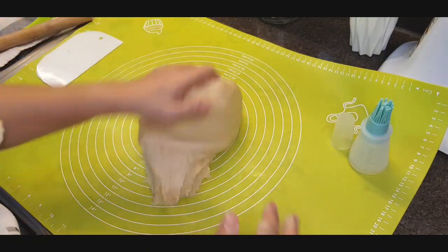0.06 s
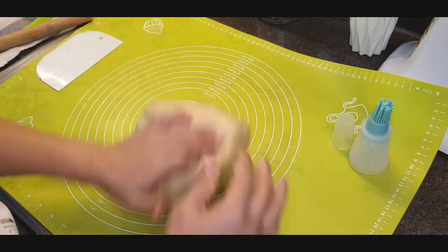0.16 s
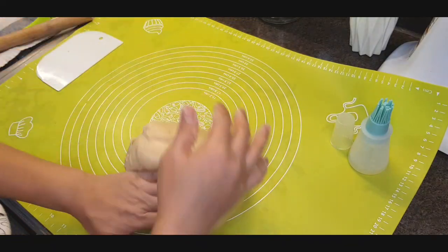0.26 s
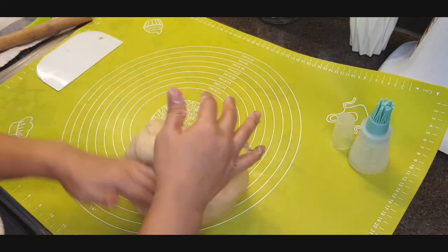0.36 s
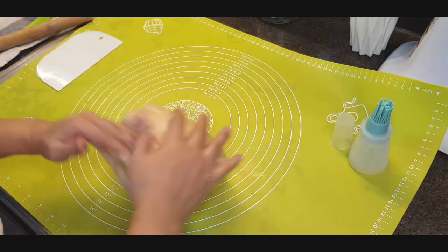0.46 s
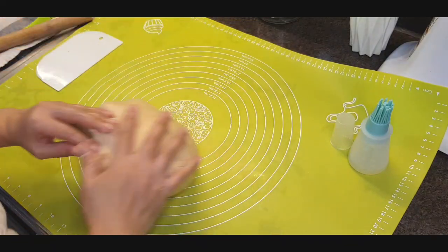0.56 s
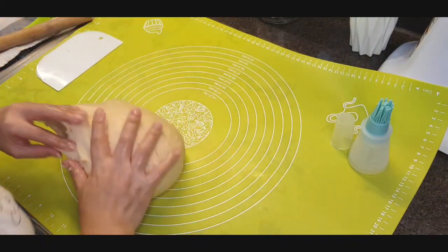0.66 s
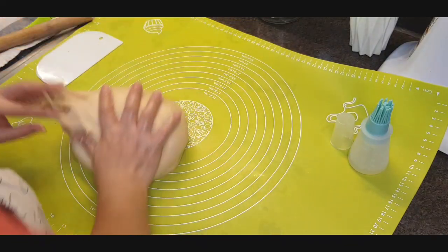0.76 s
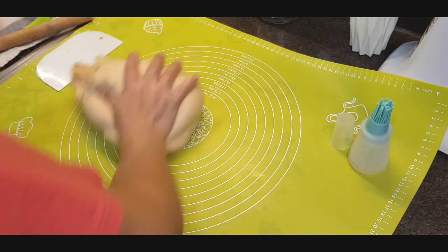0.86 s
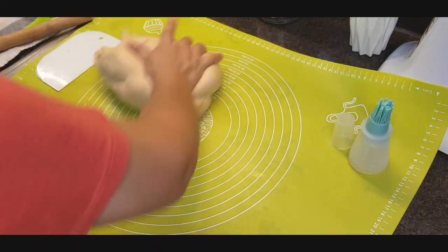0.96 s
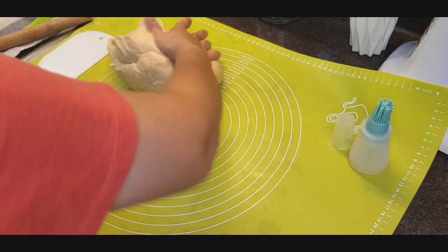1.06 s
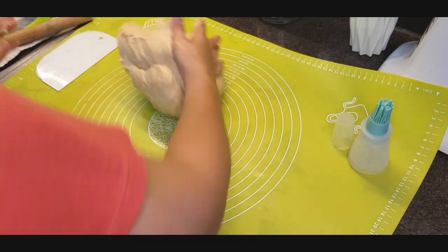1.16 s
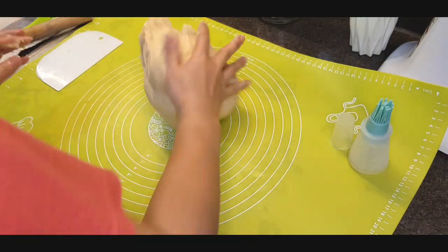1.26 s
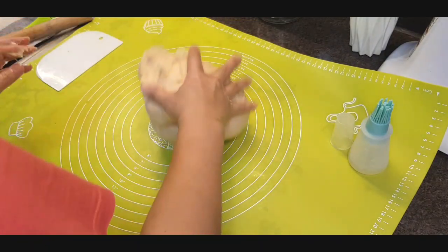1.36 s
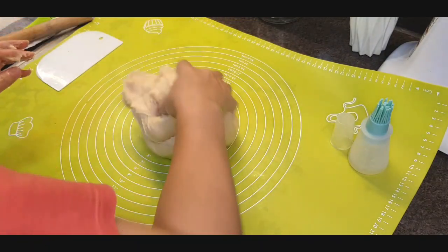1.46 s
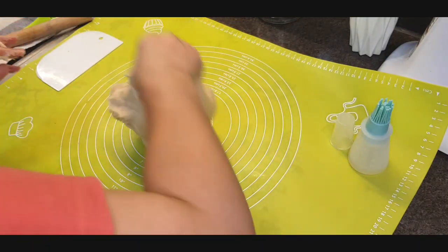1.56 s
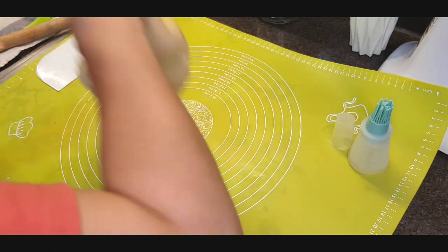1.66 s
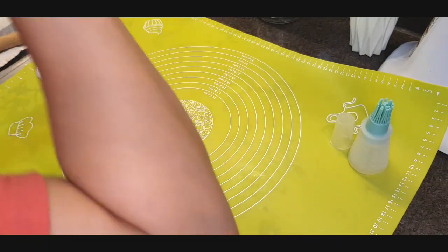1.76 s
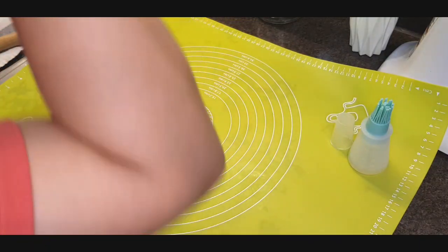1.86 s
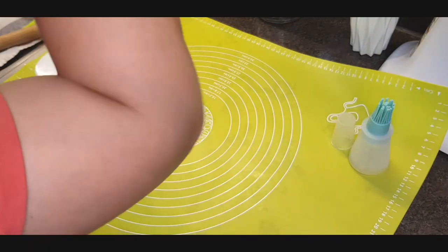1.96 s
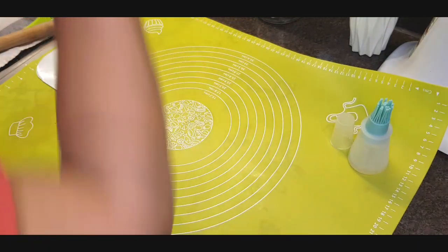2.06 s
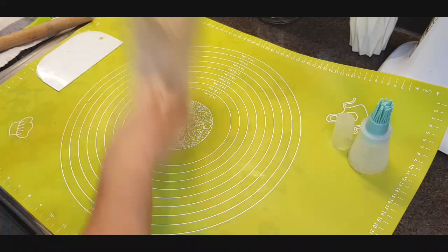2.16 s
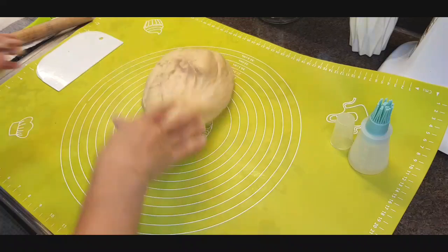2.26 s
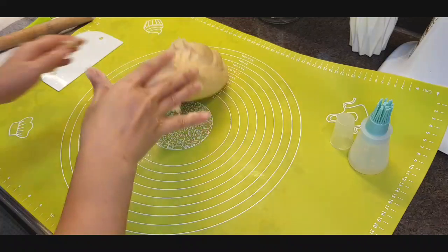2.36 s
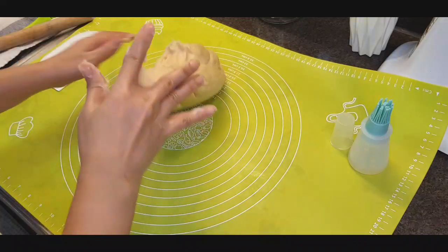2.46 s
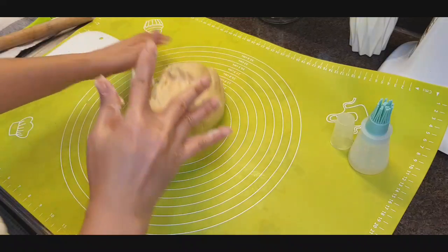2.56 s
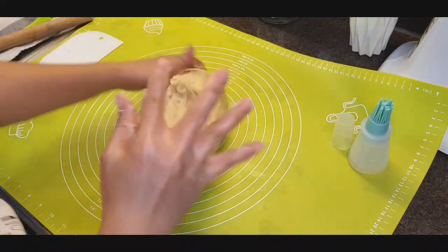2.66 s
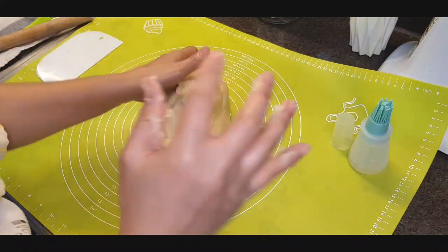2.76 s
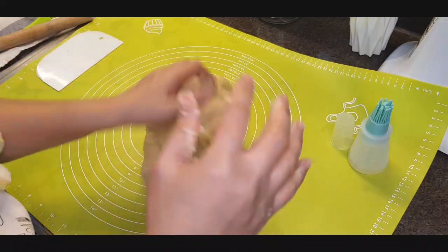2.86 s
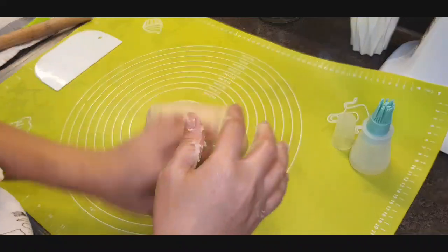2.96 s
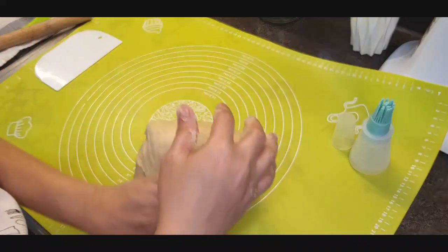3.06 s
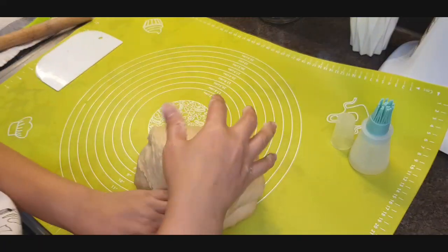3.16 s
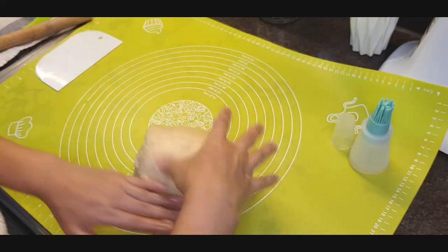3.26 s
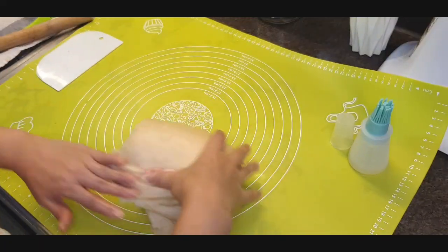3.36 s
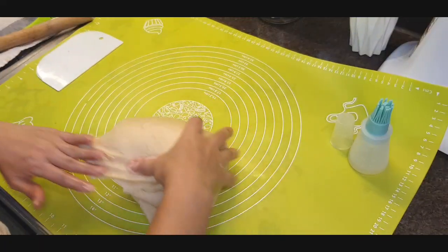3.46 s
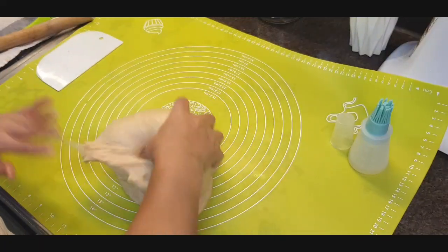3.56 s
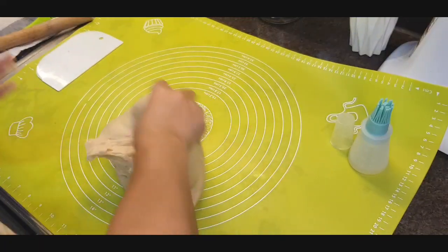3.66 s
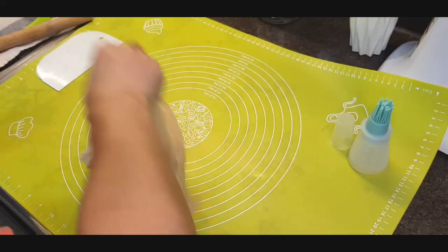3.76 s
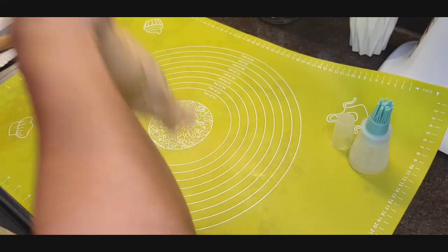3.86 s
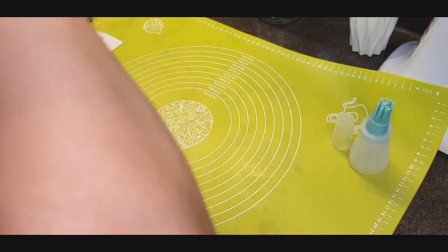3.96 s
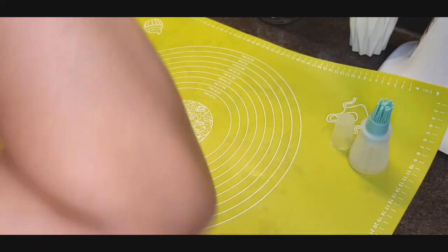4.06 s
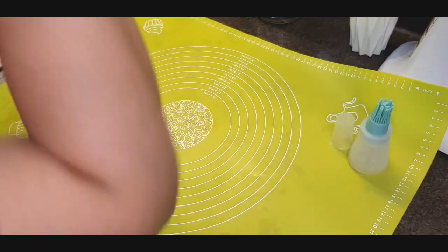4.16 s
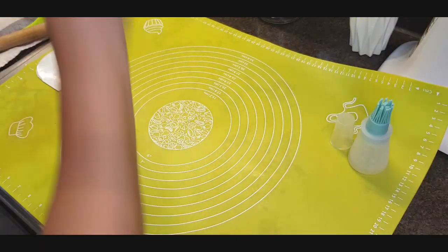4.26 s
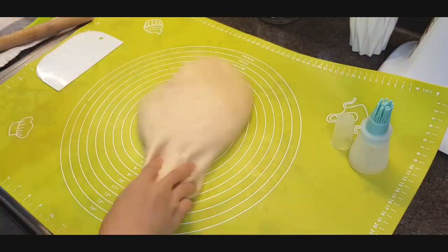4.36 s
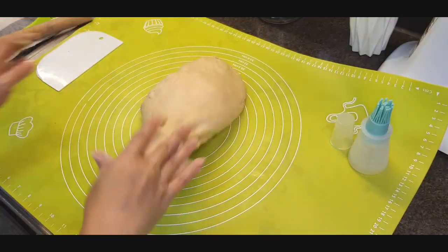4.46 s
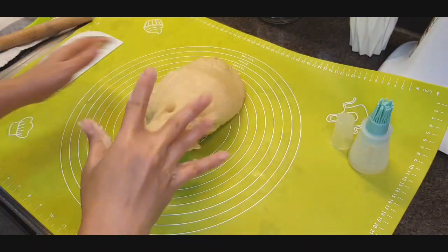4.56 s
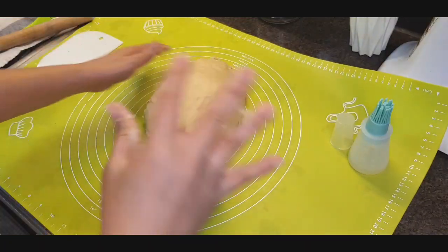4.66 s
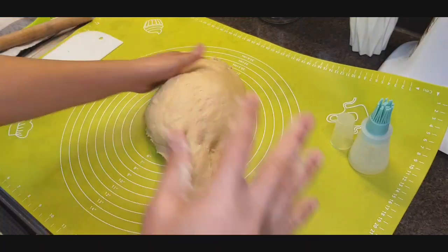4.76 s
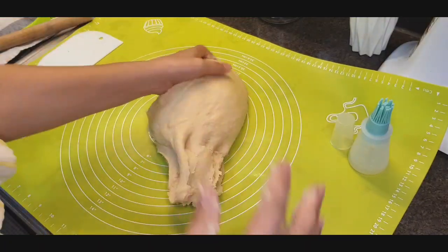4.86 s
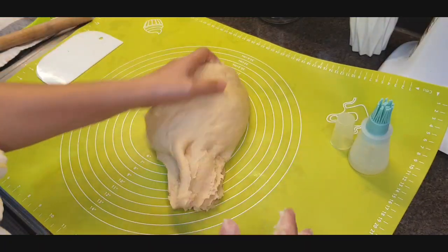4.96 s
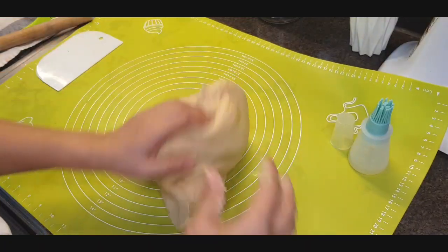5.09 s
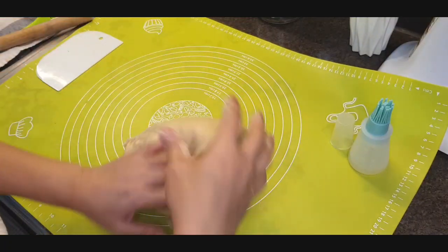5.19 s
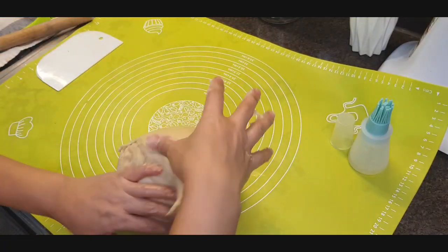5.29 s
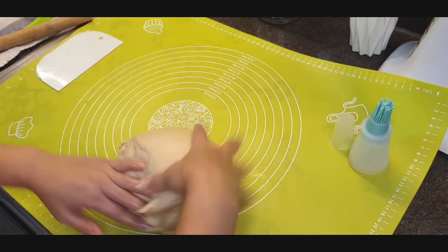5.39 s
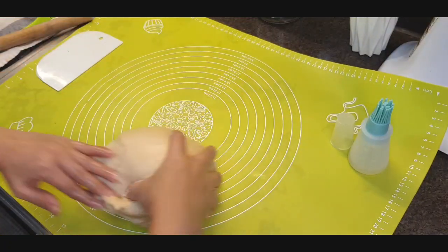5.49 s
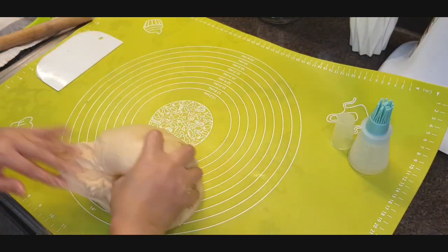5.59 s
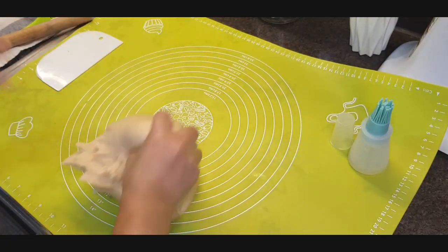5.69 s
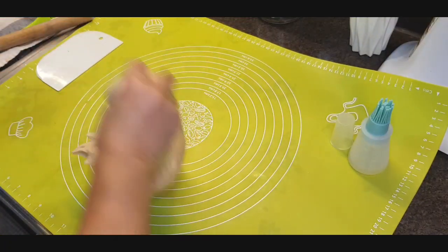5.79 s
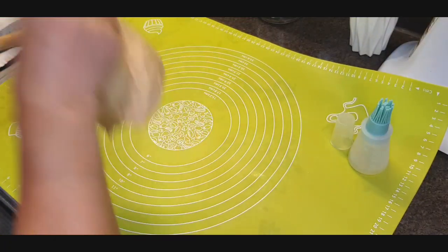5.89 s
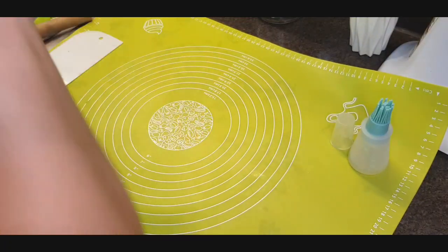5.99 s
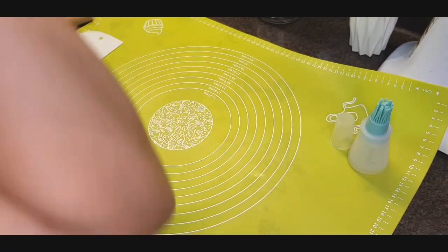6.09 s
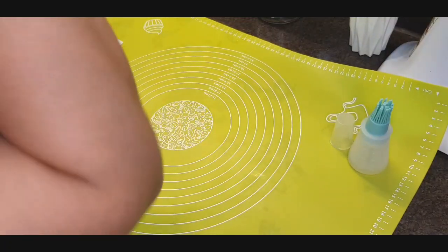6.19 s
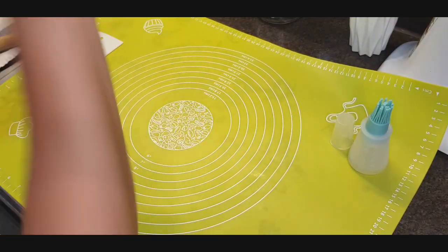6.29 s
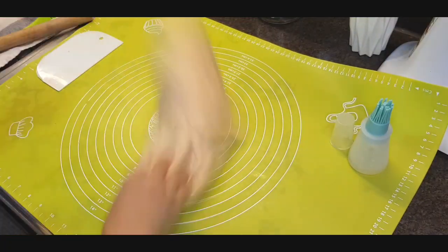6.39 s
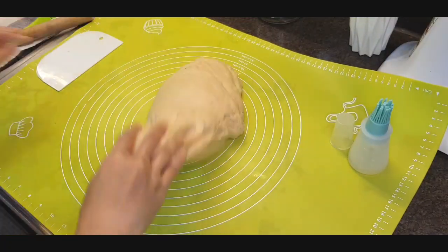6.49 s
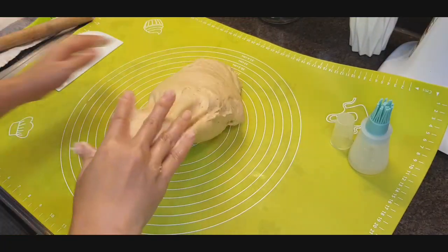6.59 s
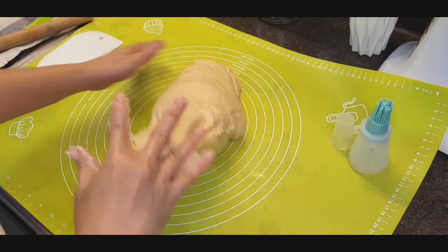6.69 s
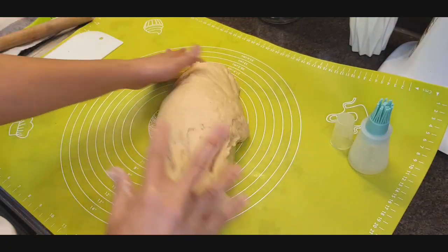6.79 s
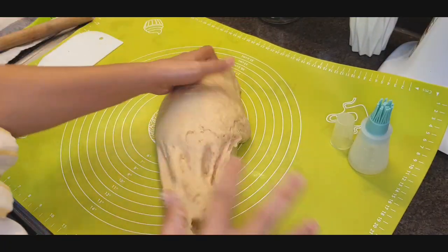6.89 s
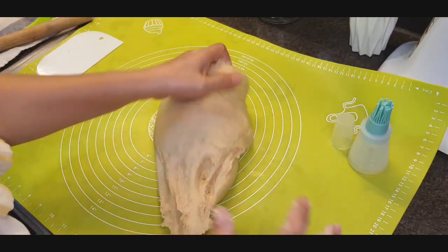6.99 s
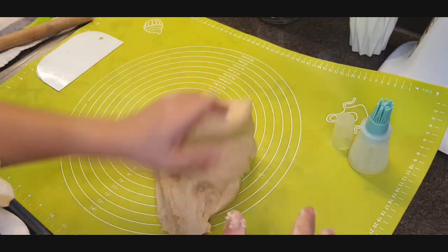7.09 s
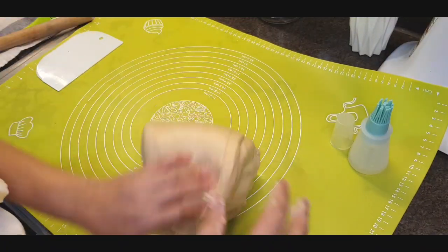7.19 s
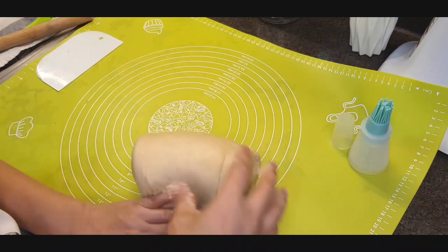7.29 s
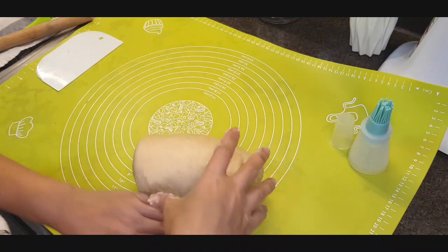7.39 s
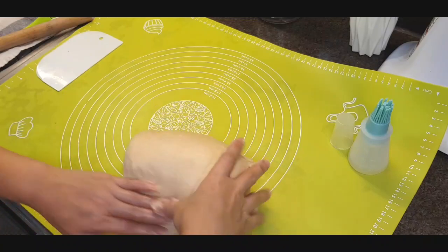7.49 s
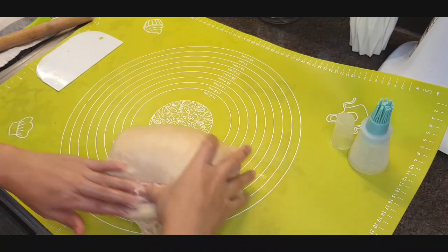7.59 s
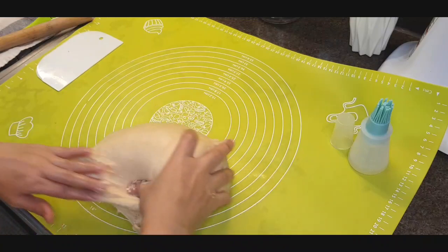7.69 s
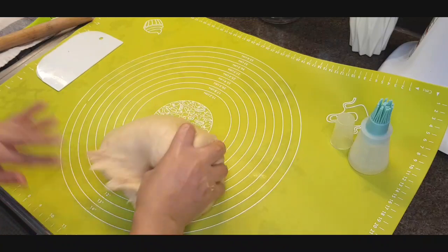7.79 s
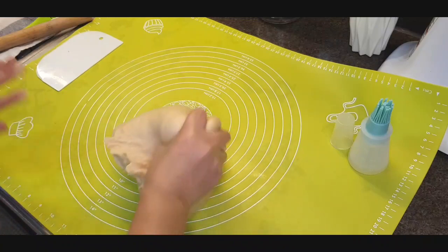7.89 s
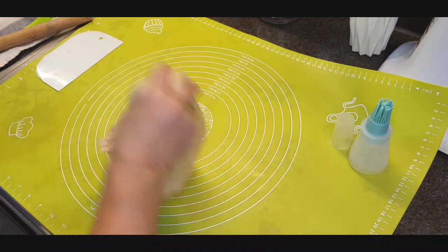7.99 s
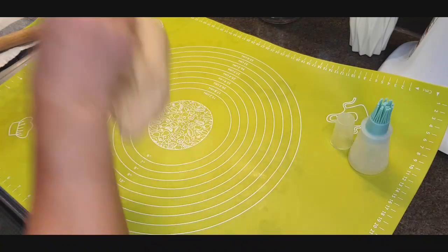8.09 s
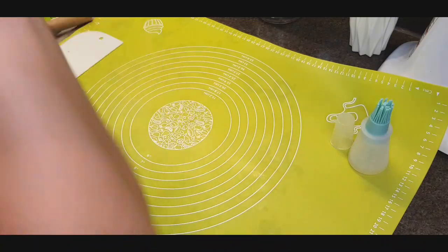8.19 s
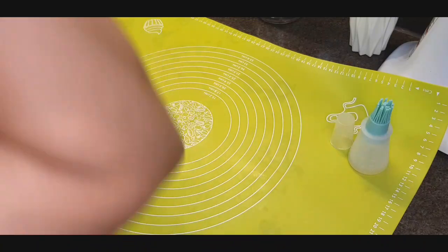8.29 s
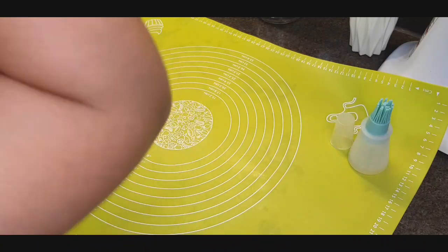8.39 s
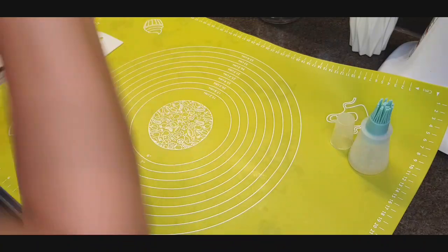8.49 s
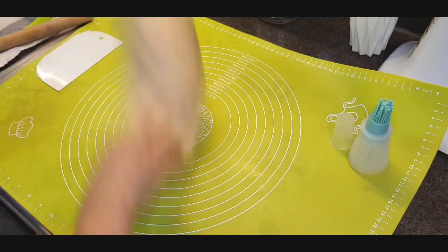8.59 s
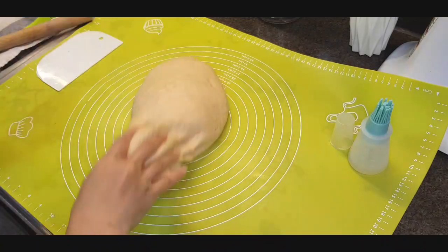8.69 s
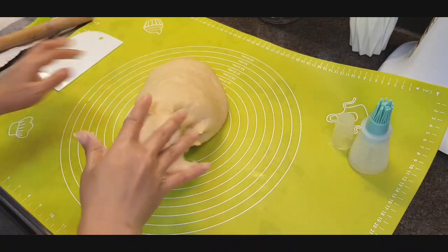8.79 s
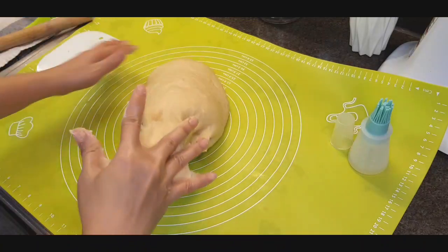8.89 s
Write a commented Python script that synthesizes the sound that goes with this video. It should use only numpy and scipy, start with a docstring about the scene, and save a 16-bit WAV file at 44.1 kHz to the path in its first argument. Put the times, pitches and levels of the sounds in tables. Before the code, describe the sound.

Hands press and fold soft, sticky dough with faint rubbing and crackle, then peel it off a silicone mat with a short hiss and small pops. The dough is slapped down four times, about two seconds apart, each a loud wet smack with a thump from the counter. The microphone is close and overloads slightly on the hits. A small, hard kitchen echoes briefly over a quiet hum.

```python
"""Slapping dough on a kitchen counter

Soft, sticky dough is slapped four times onto a silicone mat, close to a phone that overloads.
Each slap rings the counter, bursts trapped air and splatters as the dough spreads; a small, hard room
answers. In between, hands fold and press the dough and peel it off the mat, over a quiet room hum."""
import sys
import numpy as np
from scipy import signal
from scipy.fft import rfft, irfft, next_fast_len
from scipy.io import wavfile
from scipy.ndimage import uniform_filter1d

SR = 44100
rng = np.random.default_rng(int(sys.argv[2]) if len(sys.argv) > 2 else 0)


def output_pcm(signal):
    """Save a mono or channel-first signal as 16-bit PCM at the path in sys.argv[1].

    Samples are clipped to [-1, 1] before scaling.
    """
    pcm = np.clip(np.atleast_2d(signal).T, -1, 1) * 32767
    wavfile.write(sys.argv[1], SR, np.round(pcm).astype(np.int16))


N = 394254
T = np.arange(int(.8 * SR)) / SR  # seconds since the start of one short sound


def gain(db):
    """Turn decibels into a multiplier."""
    return 10 ** (np.asarray(db) / 20)


def unit(x):
    """Scale a sound to an average (rms) level of 1."""
    return x / np.sqrt(np.mean(x ** 2))


def add(out, start_s, sound):
    """Mix a sound in at the given time."""
    i = max(int(start_s * SR), 0)
    out[i:i + len(sound)] += sound[:len(out) - i]


def curve_at(hz, points):
    """Read between (pitch_hz, value) points, with octaves evenly spaced."""
    pitches, values = np.transpose(points)
    return np.interp(np.log(hz + 1), np.log(pitches), values)


def freqs(x):
    """The frequencies that make up a sound."""
    return np.fft.rfftfreq(x.shape[-1], 1 / SR)


def colour(x, tone, treble_db=0, hollow_hz=2000, hollow_db=0):
    """Shape a sound with a tone curve, a treble control and one broad resonance; level 1."""
    f = freqs(x)
    db = curve_at(f, tone) + treble_db * f ** 2 / (f ** 2 + 4500 ** 2)
    db += hollow_db * np.exp(-((f / hollow_hz - 1) / 0.19) ** 2)
    return unit(irfft(rfft(x) * gain(db), x.shape[-1]))


def fade(fade_s):
    """Die away by 60 dB in fade_s seconds."""
    return np.exp(-np.log(1000) * T / fade_s)


def ring(hz, fade_s):
    """One struck note that dies away."""
    return np.sin(2 * np.pi * hz * T) * fade(fade_s)


def snaps(per_s, scatter_db, size=len(T)):
    """Tiny sticky threads let go: random clicks of uneven size."""
    hits = rng.random(size) < per_s / SR
    return unit(hits * rng.standard_normal(size) * gain(scatter_db * rng.exponential(size=size)))


def wander(per_s):
    """A random drift, roughly 1 either side of zero."""
    steps = rng.standard_normal(400)
    return 1.2 * np.interp(np.arange(N) / SR * per_s, np.arange(len(steps)), steps)


def surrounding_noise(size, alike_hz=520):
    """Noise from all sides at two microphones: alike in the bass, unrelated in the treble."""
    noise = rng.standard_normal((2, size))
    alike = .97 / (1 + (freqs(noise) / alike_hz) ** 2)
    mid, side = rfft(noise) * np.sqrt([1 + alike, 1 - alike])
    return irfft(np.array([mid + side, mid - side]), size) / np.sqrt(2)


# Tone of the room's air: pitch_hz, relative_db
AIR_TONE = [(25, -11), (55, -1), (115, -4.5), (165, -19), (210, -18.5), (330, -13), (900, -14.5),
            (1300, -20), (1900, -18.5), (3500, -28), (5500, -27.5), (8500, -33), (12000, -33),
            (15500, -52.5)]
# Notes in an appliance's hum: pitch_hz, level_db
HUM_NOTES = [(113, -59), (280, -69.5), (404, -75.5), (856, -73.5), (1604, -78.5)]
def background(air_db=-54.5, rumble_db=-60):
    """Steady room air, a wavering hum and the faint rumble of moving air."""
    size, t = next_fast_len(N, True), np.arange(N) / SR
    air = colour(surrounding_noise(size), AIR_TONE)[:, :N]
    hum = sum(gain(db) * unit(np.sin(2 * np.pi * hz * t + 1.1 * wander(42))) for hz, db in HUM_NOTES)
    rumble_tone = [(12, -50.5), (28, -21.5), (48, -0.5), (70, -14.5), (120, -10), (220, -19), (1000, -64)]
    rumble = colour(rng.standard_normal(size), rumble_tone)[:N]
    return gain(air_db) * air + hum + gain(rumble_db) * rumble


def lean(left_db):
    """Left and right multipliers that make the left side louder by left_db."""
    return gain(left_db * np.array([[.5], [-.5]]))


def puff(hz, swell_s=0.012):
    """A sweep of air swings the microphone for a few slow cycles."""
    return (T / swell_s * np.exp(1 - T / swell_s)) ** 2 * np.sin(2 * np.pi * hz * T)


# A hand passes close to the microphone: start_s, level_db
HAND_PASSES = [(3.32, -33.5), (3.745, -38), (5.958, -37), (6.774, -32.5), (7.184, -34)]
# Arms stir the air: start_s, end_s, puff_db, left_louder_db
ARM_MOVES = [(.47, 1.15, -45, 16), (3.122, 3.706, -46.5, 24), (5.55, 6.3, -43, 20), (6.95, 7.152, -45, 14),
             (7.97, 8.295, -47, 7)]
def draughts(puff_hz=65.8, puffs_per_s=13):
    """Close hands push strong puffs of air, arms stir uneven ones, and one runs ahead of each slap."""
    out = np.zeros((2, N))
    # each puff: start_s, pitch_hz, level_db, left_louder_db
    puffs = [(s, puff_hz, db, 18) for s, db in HAND_PASSES]
    puffs += [(s - .035, 46, knock_db - 19.5, 0) for s, _, knock_db, *_ in SLAPS]
    for start_s, end_s, db, left_db in ARM_MOVES:
        chance = rng.standard_normal((20, 3))
        for s, (late, higher, louder) in zip(np.arange(start_s, end_s, 1 / puffs_per_s), chance):
            s += 0.255 * late / puffs_per_s
            puffs.append((s, puff_hz * np.exp(0.2 * higher), db + 1.5 * louder, left_db))
    for s, hz, db, left_db in puffs:
        for channel, sound in zip(out, lean(left_db) * gain(db) * puff(hz)):
            add(channel, s, sound)
    return out


# How long the kitchen echoes: pitch_hz, fade_s
ROOM_FADES = [(150, 0.69), (400, 0.44), (1100, 0.43), (2600, 0.46), (7000, 0.46), (14000, 0.38)]
def kitchen(sound, early_db=-8, tail_db=-7):
    """Quick echoes bounce off the counter and cupboards, then the whole room rings on."""
    noise = surrounding_noise(len(T))
    f, spectrum, tail = freqs(noise), rfft(noise), 0
    for band_hz, fade_s in ROOM_FADES:
        band = curve_at(f, [(hz, hz == band_hz) for hz, _ in ROOM_FADES])
        tail += irfft(spectrum * band, len(T)) * fade(fade_s)
    early = surrounding_noise(len(T)) * fade(0.088)
    arrive = 1 - np.exp(-(T / 0.001) ** 2)
    echo = gain(early_db) * unit(early * arrive) + gain(tail_db) * unit(tail * arrive)
    # the echo carries only mids and treble; the counter's low notes supply the lingering boom
    echo = signal.sosfilt(signal.butter(2, 230, "high", fs=SR, output="sos"), echo / np.sqrt(len(T)))
    return signal.oaconvolve(sound[None], echo, axes=1)[:, :N]


# Tones of the dull rub and the sticky crackle: pitch_hz, relative_db
RUB_TONE = [(100, -11.5), (200, -11), (300, -2.5), (450, -2.5), (700, -9.5), (1200, -22), (3000, -22),
            (12000, -53.5)]
CRACKLE_TONE = [(200, -9.5), (900, 2.5), (1500, -1), (2100, -2.5), (3200, -6.5), (6000, -8), (8500, -9.5),
                (12000, -10), (15500, -18)]
def rub(rub_db, crackle_db, squish_hz, size=len(T), squish_db=6):
    """Skin catches and slips on dough and mat; a sticky crackle rings the hollow under the palm."""
    drag = colour(snaps(per_s=1100, scatter_db=0, size=size), RUB_TONE)
    threads = snaps(per_s=9000, scatter_db=2.8, size=size)
    crackle = colour(threads, CRACKLE_TONE, hollow_hz=squish_hz, hollow_db=squish_db)
    return gain(rub_db) * drag + gain(crackle_db) * crackle


def press(length_s, swell_s):
    """One push of the hand swells, eases and lets go."""
    return (1 - np.exp(-T / swell_s)) * np.exp(-T / length_s - (T / length_s) ** 4)


# How hard the dough drags in the hands: time_s, level_db
HAND_DRAG = [(0, -62.5), (1.1, -71), (1.479, -75), (1.9, -63), (2.2, -56.5), (3.2, -62.5), (4.2, -63.5),
             (4.9, -57), (6.4, -58), (7.799, -62.5), (8.94, -60.5)]
# A palm lands on the dough: start_s, length_s, rub_db, crackle_db
PALM_PATS = [(2.674, 0.17, -42.5, -47), (4.783, 0.013, -36, -41), (7.519, 0.21, -45, -55.5)]
# The dough is stretched and folded: start_s, length_s, crackle_db, squish_hz
DOUGH_FOLDS = [(0.05, 0.18, -47.5, 1420), (.425, 0.11, -46.5, 2050), (0.933, 0.3, -50.5, 1650),
               (2.868, 0.12, -43, 1570), (1.295, 0.044, -48.5, 1510), (4.312, 0.043, -49, 3800),
               (5.075, 0.12, -40, 2180), (7.017, 0.21, -46.5, 1400)]
def hands():
    """The dough drags unevenly in the hands all the while; pats and folds stand out from it."""
    effort_db = np.interp(np.arange(N) / SR, *np.transpose(HAND_DRAG)) + wander(per_s=9)
    drag = rub(rub_db=-3, crackle_db=0, squish_hz=1800, size=next_fast_len(N, True), squish_db=4.5)
    out = gain(effort_db) * drag[:N]
    for s, length_s, rub_db, crackle_db in PALM_PATS:
        add(out, s, press(length_s, swell_s=0.0022) * rub(rub_db, crackle_db, squish_hz=2340))
    for s, length_s, db, hz in DOUGH_FOLDS:
        add(out, s, press(length_s, swell_s=0.55 * length_s) * rub(db - 9.5, db, hz))
    return out


# Tone of tearing threads: pitch_hz, relative_db
HISS_TONE = [(150, -17.5), (400, -4), (700, 4), (1500, -2.5), (2500, -0.5), (4000, -6), (8500, -6),
             (12000, -1.5), (15500, -5.5)]
# The dough peels off the mat: release_s, build_s, level_db, gap_hz, hiss_relative_db
MAT_PEELS = [(.17, 0.049, -58, 1190, -2), (1.666, 0.046, -51, 1520, 2), (3.719, 0.022, -74, 1200, 19),
             (3.87, 0.067, -42.5, 990, -3), (5.915, .055, -38, 1097, -5), (8.125, 0.067, -43.5, 1084, -4)]
def peels(gap_fade_s=0.0094, let_go_s=0.012, pitch_rise=0.16):
    """Threads tear louder until the dough is free; they hiss and ring the gap below at a rising pitch."""
    out = np.zeros(N)
    feedback = np.exp(-np.log(1000) / (gap_fade_s * SR))
    for release_s, build_s, db, hz, hiss_db in MAT_PEELS:
        start_s = max(release_s - 3 * build_s, 0)
        after_s = T + start_s - release_s
        pull = np.exp(-np.maximum(after_s, 0) / let_go_s - (np.minimum(after_s, 0) / build_s) ** 2 / 2)
        gap_hz = hz * (1 + pitch_rise * np.tanh(after_s / build_s))
        # each snap starts a short ring that follows the gliding pitch
        glide = np.exp(2j * np.pi * np.cumsum(gap_hz) / SR)
        gap = glide * signal.lfilter([1], [1, -feedback], snaps(per_s=1400, scatter_db=0.9) / glide)
        hiss = colour(snaps(per_s=9000, scatter_db=0.6), HISS_TONE)
        add(out, start_s, gain(db) * pull * (unit(gap.imag) + gain(hiss_db) * hiss))
    return out


def pop(hz, cycles, open_s=0.00079):
    """An air pocket opens and rings briefly, fluttering as its soft walls give way."""
    flutter = 1 + .4 * unit(uniform_filter1d(rng.standard_normal(len(T)), size=16))
    return ring(hz, cycles / hz) * flutter * (1 - np.exp(-T / open_s))


# Bubbles under the fingers: start_s, pitch_hz, level_db
LONE_BUBBLES = [(2.866, 2294, -16), (3.759, 1130, -30.5), (4.786, 1630, -27.5), (6.8765, 1140, -35)]
def bubbles(above_peel_db=13.5):
    """Lone bubbles burst in the dough, and two pops, low then high, end each peel."""
    out = np.zeros(N)
    for s, hz, db in LONE_BUBBLES:
        add(out, s, gain(db) * pop(hz, cycles=15.2))
    for release_s, _, db, hz, _ in MAT_PEELS:
        add(out, release_s - .021, gain(db + above_peel_db) * pop(hz * 0.91, cycles=17))
        add(out, release_s, gain(db + above_peel_db) * pop(hz * 1.09, cycles=17))
    return out


# Air caught under each slap: start_s, first_pop_hz, first_pop_db, step_per_pop_db, clap_db, crack_db
AIR_POCKETS = [(2.268, 1627, 4.5, 2, 4.5, -9), (4.438, 1580, 4.5, -8.5, 3, -11),
               (6.496, 1700, -6, -4, 9, -1), (8.712, 1597, 3.5, -2, 6.5, -6.5)]
def trapped_air(clap_hz=563, clap_fade_s=0.0055, crack_s=0.0026, pop_gap_s=.001):
    """A slap claps the mat and bursts four air pockets, large to small; the tiniest ones just crack."""
    out = np.zeros(N)
    for s, hz, db, step_db, clap_db, crack_db in AIR_POCKETS:
        crack = colour(snaps(per_s=8000, scatter_db=4), SPLATTER_TONE) * np.exp(-T / crack_s)
        clap = pop(clap_hz, cycles=clap_hz * clap_fade_s)
        add(out, s, gain(clap_db) * clap + gain(crack_db) * crack)
        for k in range(4):
            pitch_hz = hz * 1.28 ** k * np.exp(0.0218 * rng.standard_normal())
            add(out, s + k * pop_gap_s, gain(db + k * step_db) * pop(pitch_hz, cycles=14.1))
    return out


# Tone of wet dough splattering: pitch_hz, relative_db
SPLATTER_TONE = [(100, -21), (400, -13), (1000, 2.5), (2400, 2.5), (3300, 1), (4200, -5.5), (6000, -2),
                 (8500, -6), (11500, -3), (15500, -9)]
# Notes the counter rings with: pitch_hz, relative_db, fade_s
COUNTER_NOTES = [(56, -8, 0.16), (74.1, -6, 0.54), (116.5, -2.5, .42), (140.1, -4, 0.21), (153, 3, 0.12),
                 (182.3, -11.5, 0.24), (276.9, -2, 0.12), (313.2, -18.5, 0.2), (352, -4, 0.11),
                 (364, -25, 0.34), (449, -14, 0.12), (446.7, -0.5, 0.092), (467.5, -4.5, 0.14),
                 (528, -12, .12), (672.7, 3.5, 0.28), (890, -1, .16), (1450, -6, .12), (1605, -16.5, 0.12),
                 (1842, 10, 0.11), (2014, 5.5, 0.13), (2308, 5, 0.049)]
# The dough lands, with a hollow under it:
# start_s, thump_db, knock_db, ring_db, splatter_db, spread_s, treble_db, hollow_hz, hollow_db
SLAPS = [(2.266, -17.5, -28, -59, -13.5, 0.0073, 1.5, 2570, 9),
         (4.4380, -28.5, -30.5, -39, -16, 0.006, -6, 1900, -5),
         (6.4950, -16, -11, -35, -9.5, 0.0059, 3.5, 2240, 1),
         (8.7107, -23.5, -14.5, -30.5, -9, .007, 8, 1900, 5.5)]
def slaps(push_s=0.0008, thump_below_hz=220, knock_below_hz=520):
    """The dough hits: the counter rings, and the wet patch spreads in a spray of clicks."""
    out = np.zeros((2, N))
    for s, thump_db, knock_db, ring_db, splatter_db, spread_s, treble_db, hollow_hz, hollow_db in SLAPS:
        counter = np.zeros(len(T))
        for k, (hz, db, fade_s) in enumerate(COUNTER_NOTES):
            # the landing spot decides how hard the low, middle and high notes are struck
            strike_db = thump_db if hz < thump_below_hz else knock_db if hz < knock_below_hz else ring_db
            counter += (-1) ** k * gain(db + strike_db) * ring(hz, fade_s)
        counter *= 1 - np.exp(-T / push_s)
        contact = np.sqrt(T / spread_s * np.exp(1 - T / spread_s))
        # the wet patch is wide and near, so each microphone gets its own spray
        for channel in out:
            clicks = snaps(per_s=6000, scatter_db=2)
            spray = colour(clicks, SPLATTER_TONE, treble_db, hollow_hz, hollow_db)
            add(channel, s, counter + gain(splatter_db) * contact * spray)
    return out


def scene():
    """The dough is worked on the mat, a little nearer the left microphone, and the room answers."""
    handling = trapped_air() + bubbles() + peels() + hands()
    delayed = np.pad(handling, (2, 0))[:N]  # reaches the right side two samples later
    mat = slaps() + np.array([handling, delayed])
    room = kitchen(mat[0]) + kitchen(mat[1])
    return (mat + room) * lean(left_db=1.4) + draughts() + background()


def record(dry, low_cut_hz=37, high_cut_hz=15850):
    """The phone drops the deepest bass, flattens the peaks of the slaps and cuts the highest treble."""
    sound = signal.sosfilt(signal.butter(4, low_cut_hz, "high", fs=SR, output="sos"), dry)
    clipped = np.clip(sound, -.97, .97)
    return signal.sosfilt(signal.ellip(10, .2, 70, high_cut_hz, fs=SR, output="sos"), clipped)


dry = scene()
out = record(dry)
output_pcm(out)
```